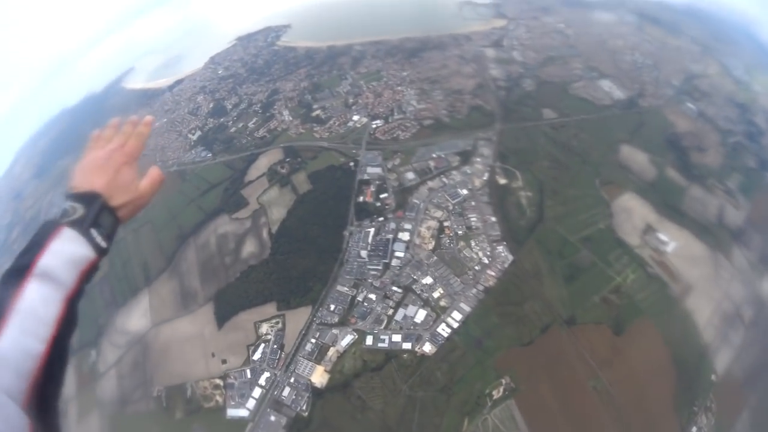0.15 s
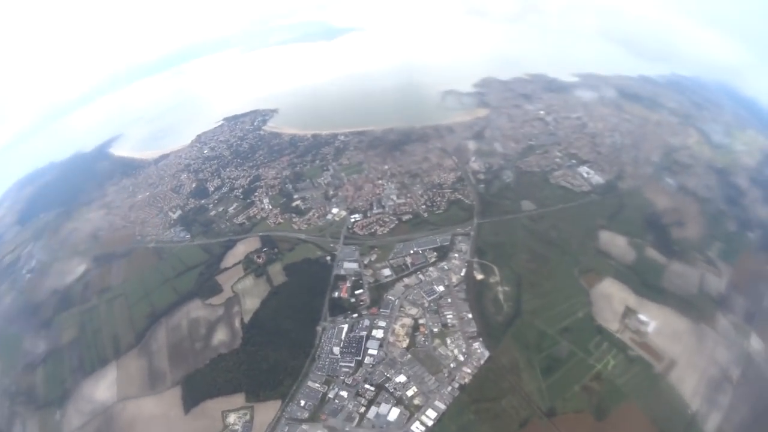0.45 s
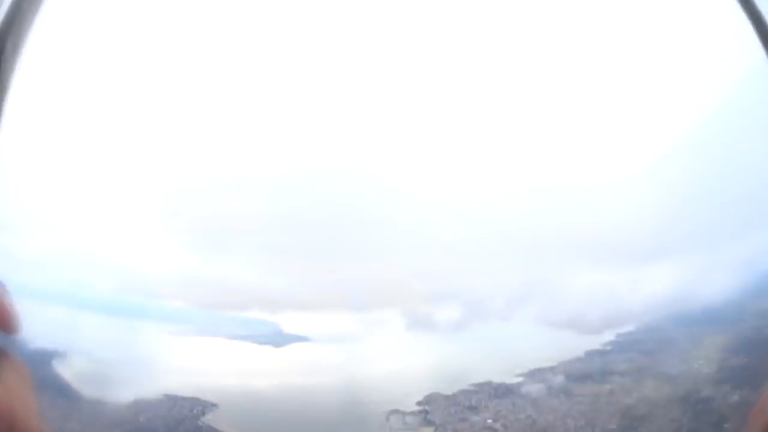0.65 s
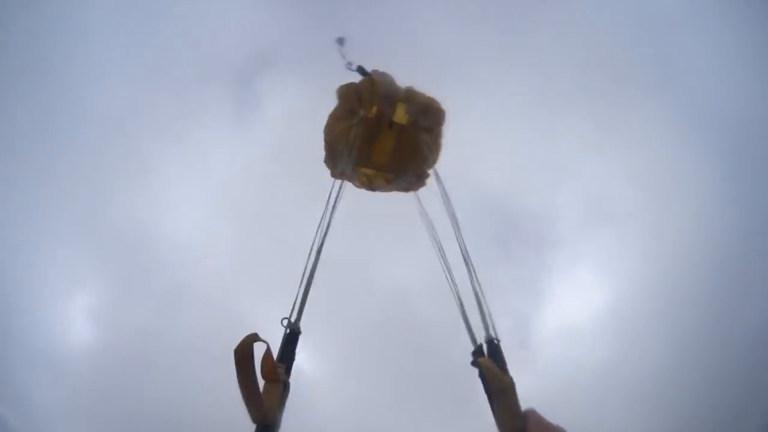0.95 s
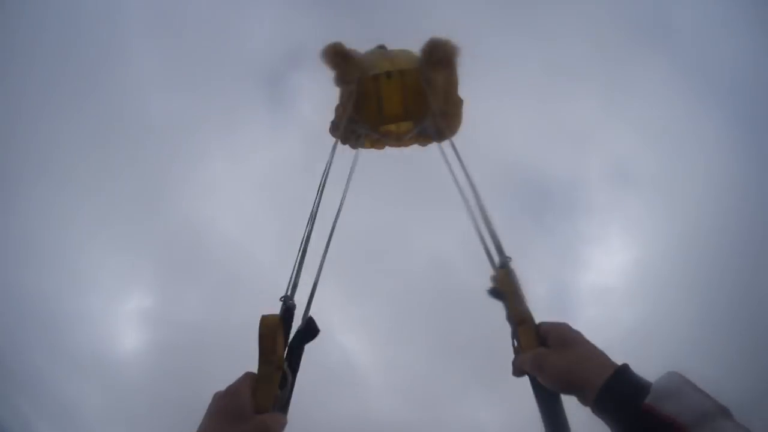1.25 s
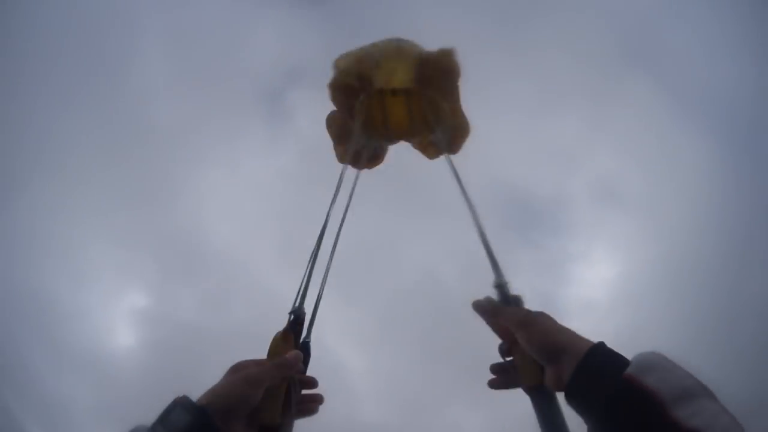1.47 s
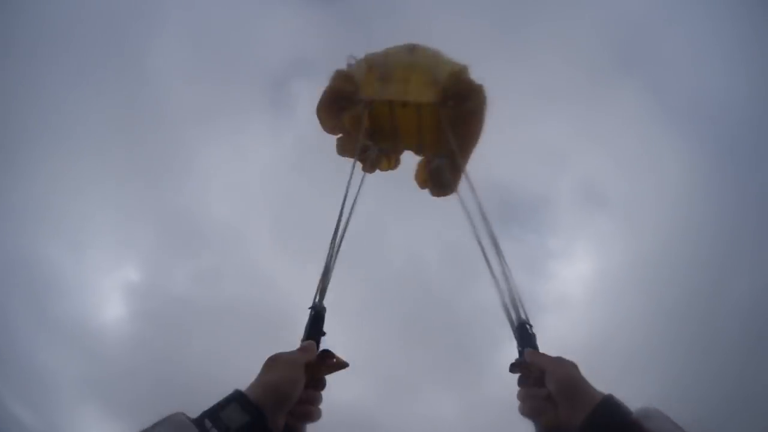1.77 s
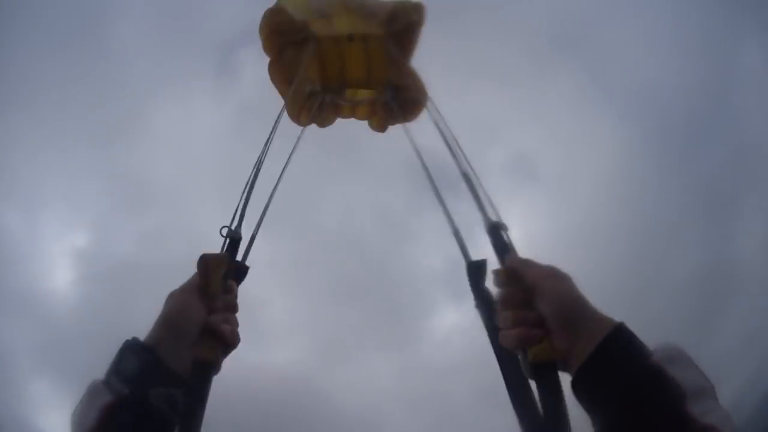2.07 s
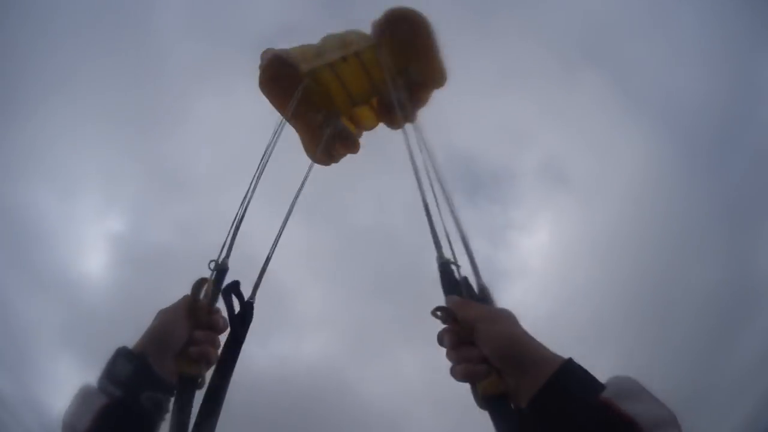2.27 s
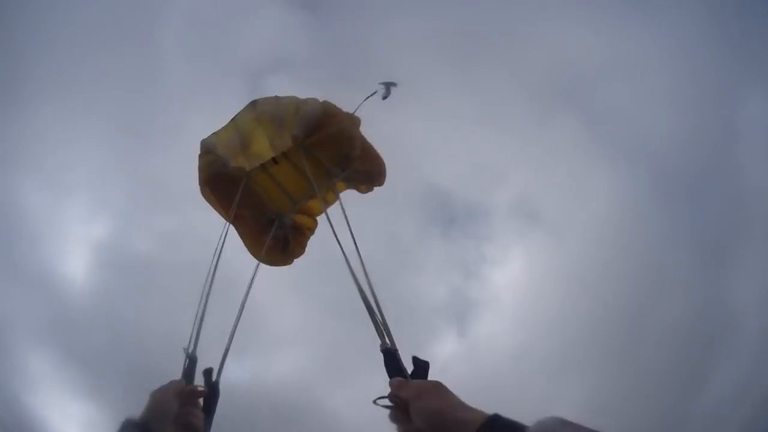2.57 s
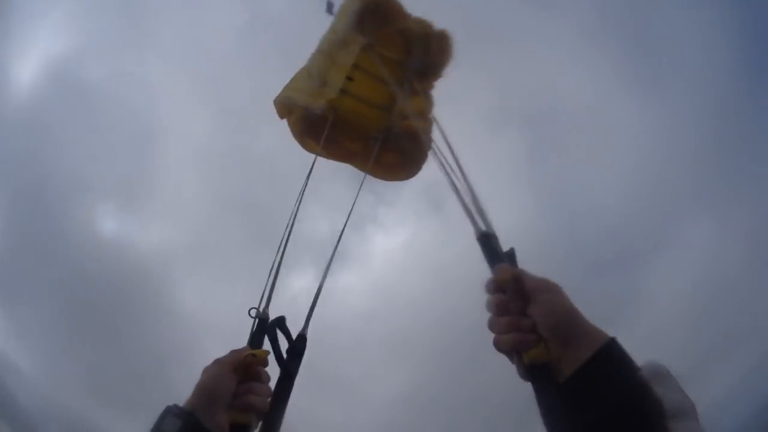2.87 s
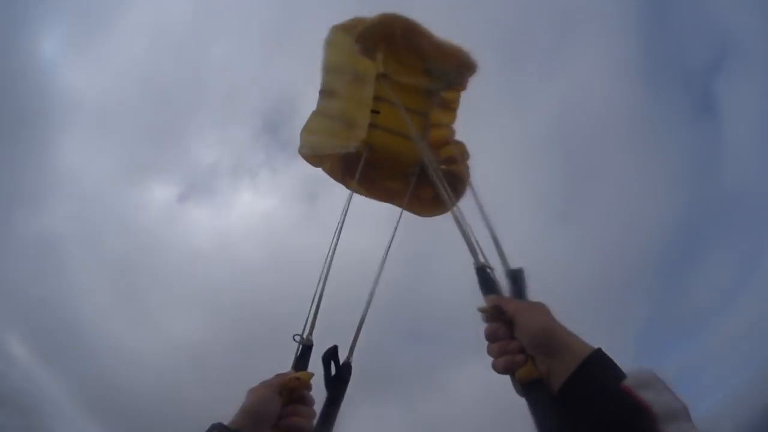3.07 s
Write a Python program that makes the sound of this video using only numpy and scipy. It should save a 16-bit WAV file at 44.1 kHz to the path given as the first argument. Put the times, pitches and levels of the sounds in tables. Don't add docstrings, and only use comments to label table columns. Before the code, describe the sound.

Skydiver's wind: from 0 to about 0.6 s a grainy roar and spitting hiss overload the head-worn microphones, with low buffeting and dry ticks. The hiss cuts near 0.57 s and the roar collapses around 0.75 s. Until 1.5 s, straps and fabric flutter and slap hollowly on the housing, buckles knocking. Then quieter, looser slaps and knocks, uneven low buffets, a sharp crack near 2.65 s, until 3.2 s.

```python
import sys
import numpy as np
from scipy import signal
from scipy.fft import rfft, irfft, next_fast_len
from scipy.io import wavfile
from scipy.ndimage import uniform_filter1d

SR = 44100
rng = np.random.default_rng(int(sys.argv[2]) if len(sys.argv) > 2 else 0)


def convert_level_to_amplitude(level_db):
    exponent = np.asarray(level_db, float) / 20
    return 10 ** exponent


def bounce(signal):
    frames = np.transpose(np.atleast_2d(signal))
    limited = np.clip(frames, -1, 1)
    pcm = np.round(limited * 32767).astype(np.int16)
    wavfile.write(sys.argv[1], SR, pcm)


N = 142002


def rms_one(x):
    return x / np.sqrt(np.mean(x ** 2) + 1e-20)


def level(rows):
    s, db = np.transpose(rows)
    return convert_level_to_amplitude(np.interp(np.arange(N) / SR, s, db))


def at_hz(points, hz):
    f, v = np.transpose(points)
    return np.interp(np.log(hz + 1), np.log(f + 1), v)


def band_pass(x, order, low_hz, top_hz):
    return signal.sosfilt(signal.butter(order, [low_hz, top_hz], "band", fs=SR, output="sos"), x)


def hiss():
    return rng.standard_normal((2, N))


def drift(rate):
    r = np.exp(-32 * np.pi * rate / SR)
    settle = 3000
    slow = signal.lfilter([1], [1, -2 * r, r * r], rng.standard_normal(N // 16 + settle + 2))
    slow = rms_one(slow[settle:])
    return np.interp(np.arange(N) / 16, np.arange(len(slow)), slow)


def grainy(per_s, size_db, grain_s):
    sizes = convert_level_to_amplitude(size_db * np.minimum(rng.exponential(1, N), 3.0))
    bursts = (rng.random(N) < per_s / SR) * sizes
    r = np.exp(-1 / (grain_s * SR))
    gain = 1 + signal.lfilter([1], [1, -r], bursts)
    return rms_one(gain * hiss())


def turbulence(noise, colour, shared_db, own_db, rate):
    hz = np.fft.rfftfreq(N, 1 / SR)
    spec = rfft(noise) * convert_level_to_amplitude(at_hz(colour, hz))
    together = drift(rate) + 0.36 * drift(rate / 4)
    low, top = np.log2(colour[0][0]), np.log2(min(colour[-1][0], 14000))
    out = 0
    for centre in np.arange(np.floor(2 * low) / 2, top + .5, .5):
        share = np.clip(1 - 2 * np.abs(np.log2(hz + 1) - centre), 0, 1)
        flicker = convert_level_to_amplitude(shared_db * together + own_db * drift(rate))
        out = out + irfft(spec * share, N) * flicker
    return rms_one(out)


def resonance(x, hz, width):
    r = np.exp(-np.pi * width / SR)
    zeros = np.array([1, 0, -1]) * (1 - r * r) / 2
    poles = [1, -2 * r * np.cos(2 * np.pi * hz / SR), r * r]
    return signal.lfilter(zeros, poles, x)


def burst(s, length, attack, release):
    t = np.arange(N) / SR - s
    rise = np.clip(t / attack + 1, 0, 1)
    decay = np.exp(-np.clip(t - length, 0, .3) / release)
    return rise * decay * (t < .3)


# [t/s, level/dB]
HEAVE_LEVEL = [(0, -47), (1.0, -37.5), (2.6, -32), (3.22, -42)]
# [f/Hz, level/dB per Hz]
HEAVE_SPECTRUM = [(15, -22), (30, -7), (60, 3), (120, -9.5)]


def heave():
    return level(HEAVE_LEVEL) * turbulence(hiss(), HEAVE_SPECTRUM, shared_db=4.0, own_db=1.3, rate=4.3)


# [t/s, level/dB]
BUFFET_LEVEL = [(0, -17.5), (.15, -25), (.3, -30.5), (.6, -24), (.73, -24), (.85, -25.5), (1.0, -27),
                (1.5, -21), (1.64, -28.5), (1.75, -25), (2.3, -30), (2.44, -36), (2.56, -31), (2.69, -22),
                (2.82, -33.5), (2.92, -40.5), (3.1, -31.5), (3.22, -33.5)]
# [f/Hz, level/dB per Hz]
BUFFET_SPECTRUM = [(15, -36), (35, -35), (90, -3.5), (183, -0.5), (330, -7.5), (700, -25), (1200, -19),
                   (1600, -33)]


def buffeting():
    return level(BUFFET_LEVEL) * turbulence(hiss(), BUFFET_SPECTRUM, shared_db=2.44, own_db=2.0, rate=17)


# [t/s, level/dB]
ROAR_LEVEL = [(0, -20), (.2, -21), (.27, -21), (.45, -22), (.62, -21.5), (.75, -31), (.9, -76), (1.1, -42),
              (1.6, -71)]
# [f/Hz, level/dB per Hz]
ROAR_SPECTRUM = [(300, 2.5), (480, 2), (700, -1.5), (1200, 1.5), (1650, 2), (2150, -4), (3000, -9),
                 (5000, -40)]


def roar():
    eddies = grainy(200, 0.41, grain_s=0.00043)
    return level(ROAR_LEVEL) * turbulence(eddies, ROAR_SPECTRUM, shared_db=-0.5, own_db=2.5, rate=81)


# [t/s, level/dB]
JET_LEVEL = [(0, -29.5), (.05, -29.5), (.14, -32), (.16, -26), (.2, -34), (.215, -25.5), (.435, -30.5),
             (.445, -37), (.52, -34), (.565, -28.5), (.575, -45.5), (.7, -43), (1.3, -42), (1.8, -49),
             (2.2, -44.5), (2.82, -51.5), (3.1, -48.5), (3.22, -45.5)]
# [f/Hz, level/dB per Hz]
JET_SPECTRUM = [(2500, -76), (4000, 6.5), (6000, 7), (7800, 3), (10500, 13.5), (12500, -5.5)]


def jet():
    spits = grainy(150, 2.2, grain_s=0.0017)
    strength = level(JET_LEVEL)
    stream = strength * convert_level_to_amplitude(8.0) * turbulence(spits, JET_SPECTRUM, shared_db=2.5, own_db=0.5, rate=17.0)
    body = signal.sosfiltfilt(signal.butter(2, 7600, fs=SR, output="sos"), stream)
    full_db, follows = -32.5, 0.47
    return stream + body * ((strength / convert_level_to_amplitude(full_db)) ** follows - 1)


# [t/s, peak/dB, tilt to the higher ring/dB]
TICK_EVENTS = [(0.0767, -5, 0), (0.1523, -1, 2), (0.2114, -15, 0), (0.3, -11, 0), (0.351, -11, -3),
               (0.3696, -22, 0), (0.401, -6.5, 3), (0.4534, -8, 4), (0.4683, -12, 0), (0.4934, -6, 6),
               (0.5054, -9, 12), (0.5134, -24, 0), (0.5242, -1, 18), (0.5334, -19, -2), (0.544, -19, 0),
               (0.5616, -7, 10), (0.6809, -27, 0), (0.7218, -19, -4), (0.7345, -5, -12), (0.7474, -22, 3),
               (0.7784, -8, -9), (0.8003, -6, 0), (0.851, -10, -6), (0.9088, -23, 0), (0.9164, -15, 0),
               (0.937, -13, -4), (0.9767, -11, -11), (0.9884, -14, 0), (1.061, -8, -3), (1.125, -14, 0),
               (1.1634, -15, -10), (1.203, -13, -7), (1.2301, -8, -3), (1.29, -22, -5), (1.306, -4, -19),
               (1.323, -6, -17), (1.3578, -20, 0), (1.3853, -24, -4), (1.444, -13, -8), (1.5209, -20, 3),
               (1.694, -32, 0), (1.872, -24, 0), (1.9924, -33, 0), (2.0894, -20, 0), (2.1074, -14, 2),
               (2.2164, -26, 0), (2.334, -14, 11), (2.38, -15, 3), (2.4389, -22, -3), (2.5182, -28, 0),
               (2.6563, -5, -3), (2.6978, -14.5, 4), (2.7154, -33, 2), (2.7606, -18, 5), (2.779, -26, -8),
               (2.8794, -37, 0), (2.9043, -27, 0), (2.916, -15.5, 0), (2.955, -17, 7)]


def ticks():
    size, decay_s, low_hz, high_hz = 400, 0.0014, 5200, 9400
    out, t = np.zeros((2, N)), np.arange(size) / SR
    for s, db, tilt_db in TICK_EVENTS:
        crack = rng.standard_normal((2, size)) * np.exp(-t / decay_s)
        lower = convert_level_to_amplitude(-tilt_db / 2) * resonance(crack, low_hz, 3500)
        higher = convert_level_to_amplitude(tilt_db / 2) * resonance(crack, high_hz, 4400)
        ring = lower + higher
        start = int(s * SR)
        out[:, start:start + size] += convert_level_to_amplitude(db - 2) * ring / np.abs(ring[0]).max()
    return out


# [t/s, peak/dB, pitch f/Hz]
KNOCK_EVENTS = [(.226, -2, 1500), (0.228, -10, 1300), (.231, -13.5, 1970), (2.918, -22, 3500),
                (2.575, -22, 3580), (0.816, -4, 2260), (1.872, -16, 2090), (2.006, -20.5, 1770),
                (2.045, -23, 1890), (2.089, -13, 3000), (2.128, -23, 3700), (2.145, -19, 2000),
                (2.278, -16, 1860), (2.503, -18, 1860), (2.561, -14, 1860), (2.716, -19, 1720),
                (2.886, -22, 1290), (3.061, -14.5, 1770), (3.162, -16, 1610), (0.724, -8.5, 233),
                (.877, -30, 2000), (1.694, -9.5, 2100), (1.887, -8, 1910), (2.34, -30, 265),
                (2.53, -12.5, 2700), (2.779, -8.5, 3950), (2.780, -17.5, 2930), (2.906, -20, 3800),
                (2.906, -8.5, 2220), (3.098, -15, 256)]


def knocks():
    size, decay_s, blow = 1500, .0025, 5
    out, t = np.zeros((2, N)), np.arange(size) / SR
    for s, db, hz in KNOCK_EVENTS:
        slow = np.sqrt(2000 / hz)
        shudder = rng.standard_normal((2, size)) * np.exp(-t / decay_s / slow)
        shudder[:, 0] = blow * slow * np.sign(shudder[:, 0])
        width = .7 * hz
        ring = resonance(resonance(shudder, hz, width), hz, width)
        start = int(s * SR)
        out[:, start:start + size] += convert_level_to_amplitude(db) * ring / np.abs(ring[0]).max()
    return out


# [f/Hz, width/Hz, level/dB]
CAVITIES = [(1874, 315, 2.5), (2810, 130, -0.5), (3720, 770, -2.5), (5400, 63, -14), (6550, 540, -18.5)]


def housing(x):
    heard = convert_level_to_amplitude(-22.5) * band_pass(x, 2, 730, 4250)
    for k, (hz, width, db) in enumerate(CAVITIES):
        heard = heard + (-1) ** k * convert_level_to_amplitude(db) * resonance(x, hz, width)
    return signal.sosfilt(signal.butter(3, 7470, fs=SR, output="sos"), heard)


# [t/s, level/dB]
FLUTTER_LEVEL = [(0, -27), (.68, -27), (.72, -17.5), (.85, -27.5), (.865, -27), (.905, -33), (.915, -22.5),
                 (1.05, -17), (1.38, -21), (1.55, -27.5), (1.64, -30.5), (1.72, -29.5), (2.2, -32),
                 (2.45, -36), (2.58, -29), (2.775, -33.5), (2.79, -40.5), (3.22, -34)]
# [t/s, peak/dB, length/s]
SLAP_EVENTS = [(0.224, -10, 0.0057), (0.722, -11, 0.0029), (0.734, -6.5, 0.0018), (0.772, -7, 0.008),
               (0.803, -6.5, 0.0069), (0.814, -8, 0.00093), (0.833, -9.5, 0.0114), (.875, -2.5, 0.0023),
               (0.908, -6, 0.0032), (0.913, -34, 0.0095), (0.927, -9.5, 0.02), (0.952, -3.5, 0.011),
               (1.203, -28, 0.0038), (1.299, -9, 0.0234), (1.356, -6, 0.02), (1.468, -9, 0.0081),
               (1.496, -9.5, 0.012), (1.528, -11, 0.0074),
               (1.715, -15, 0.015), (1.869, -18, 0.0046), (1.879, -10, 0.011), (1.913, -15.5, 0.026),
                      (1.993, -18, 0.0033), (2.062, -13, 0.03), (2.125, -12.5, 0.0094),
                      (2.137, -15.5, 0.022), (2.278, -14.5, 0.012), (2.339, -8, 0.0016),
                      (2.506, -20, 0.006), (2.522, -11, 0.0099), (2.552, -10.5, 0.032),
                      (2.611, -15.5, 0.018), (2.653, -19, 0.0062), (2.682, -18.5, 0.018),
                      (2.715, -17, 0.0042), (2.767, -17, 0.013), (2.907, -25, 0.0074), (2.912, -20, 0.0092),
                      (2.927, -17, 0.0079), (3.035, -19.5, 0.0082), (3.053, -18, 0.012),
                      (3.097, -12.5, 0.0032), (3.102, -20, 0.013), (3.161, -23.5, 0.016)]
# [f/Hz, level/dB per Hz]
PUSH_SPECTRUM = [(70, -7), (140, -4), (220, -4), (400, -5.5), (700, -10.5), (1200, -17), (1600, -16)]


def fabric():
    unit = np.std(housing(rng.standard_normal(N)))
    slaps = 0
    for s, db, length in SLAP_EVENTS:
        slaps = slaps + convert_level_to_amplitude(db - 11) * burst(s, length, attack=0.0014, release=0.00072)
    flutter = level(FLUTTER_LEVEL) * convert_level_to_amplitude(.8 * drift(18))
    rattle = flutter * grainy(700, 4, grain_s=0.00056)
    rattle = rattle + slaps * grainy(900, 2.4, grain_s=.0007)
    r = np.exp(-1 / (0.0022 * SR))
    motion = signal.lfilter([1 - r], [1, -r], np.hypot(flutter, slaps))
    push = motion * turbulence(hiss(), PUSH_SPECTRUM, shared_db=1.65, own_db=1.5, rate=100)
    return housing(rattle) / unit + convert_level_to_amplitude(-4) * push


# [f/Hz, likeness/0-1]
PORT_LIKENESS = [(40, 1), (130, 1), (270, 0.8), (580, 1), (1220, 0.48), (2000, 0.84), (4000, 0.45),
                 (9000, 0.19)]
# [f/Hz, phase/rad]
PORT_LEAD = [(0, 0), (860, -1.1), (1810, -0.3), (3450, -0.3), (4050, -2.3), (6460, -3.6), (9390, -2.3),
             (11900, -3.3)]
# [f/Hz, level/dB]
PORT_BALANCE = [(60, 0), (170, -1), (500, 0.5), (1420, 0.0), (4090, 1.5), (11700, -1)]


def ports(pair):
    size = next_fast_len(N + 512)
    hz = np.fft.rfftfreq(size, 1 / SR)
    shared, apart = rfft(pair, size)
    alike = np.clip(at_hz(PORT_LIKENESS, hz), 0, .97)
    f, lead = np.transpose(PORT_LEAD)
    turn = np.exp(.5j * np.interp(hz, f, lead)) * convert_level_to_amplitude(at_hz(PORT_BALANCE, hz) / 2)
    shared = shared * np.sqrt((1 + alike) / 2)
    apart = apart * np.sqrt((1 - alike) / 2)
    return irfft([(shared + apart) * turn, (shared - apart) / turn], size)[:, :N]


def scene():
    wind = heave() + buffeting() + roar() + jet()
    return ports(wind + ticks() + knocks() + fabric())


def band_limit(x):
    return signal.sosfilt(signal.butter(12, 17000, fs=SR, output="sos"), x)


# [t/s, level/dB]
SNAP_EVENTS = [(2.656, -22), (2.778, -30), (.505, -48)]


def record(dry):
    x = .95 * np.tanh(dry / .95)
    cutoff_hz = 11150
    cut = signal.sosfilt(signal.ellip(12, .5, 95, cutoff_hz, fs=SR, output="sos"), x)
    leak = band_pass(x, 3, cutoff_hz, cutoff_hz + 1100)
    power = uniform_filter1d((leak ** 2).sum(axis=0), size=100)
    jump = power / (uniform_filter1d(power, size=3000) + 1e-12)
    gate = uniform_filter1d(1. * (jump > 3.5), size=100)
    top = convert_level_to_amplitude(-18) * gate * leak
    snap = band_pass(x, 4, 12300, 16800)
    for s, db in SNAP_EVENTS:
        top = top + convert_level_to_amplitude(db) * burst(s, .002, attack=.001, release=.0005) * snap
    return band_limit(cut + top)


dry = scene()
out = record(dry)
bounce(out)
```